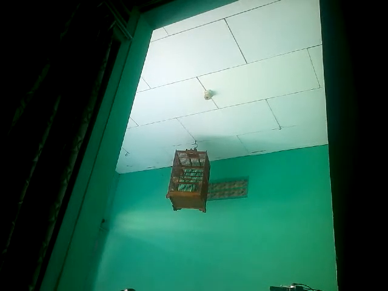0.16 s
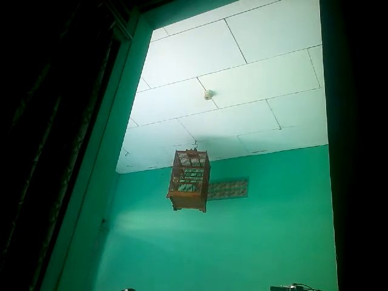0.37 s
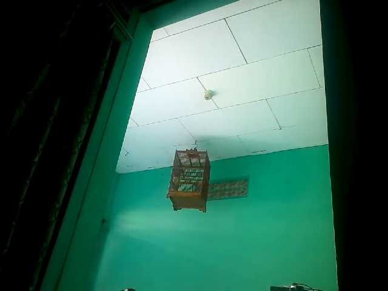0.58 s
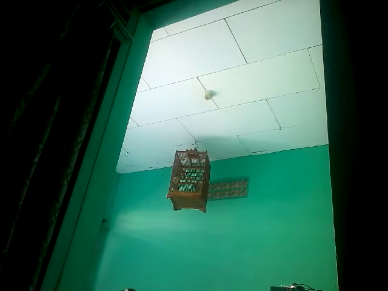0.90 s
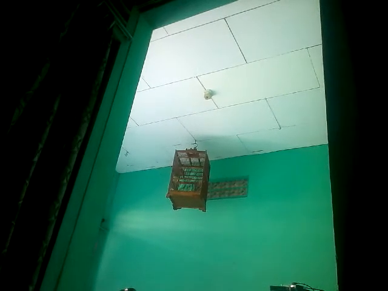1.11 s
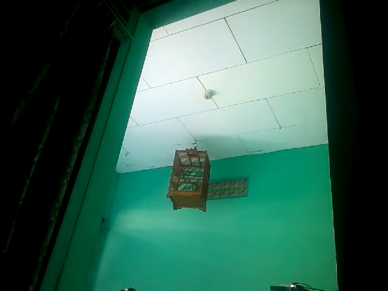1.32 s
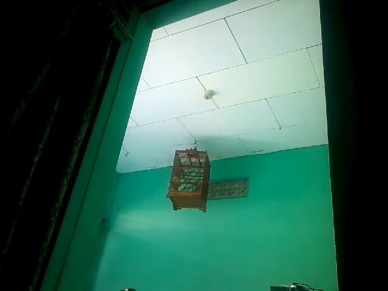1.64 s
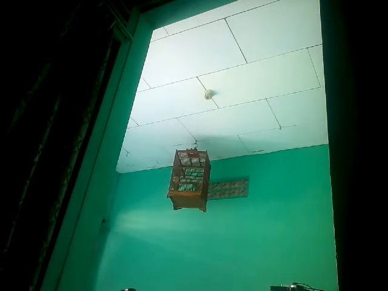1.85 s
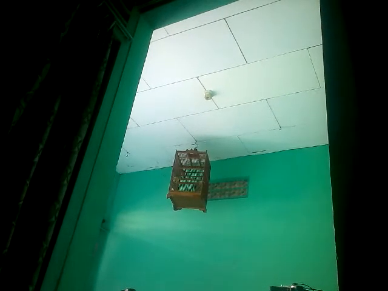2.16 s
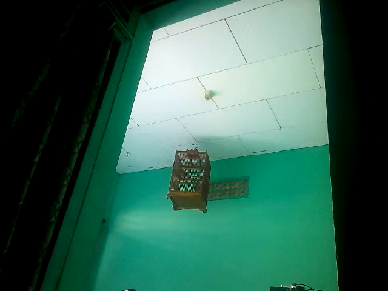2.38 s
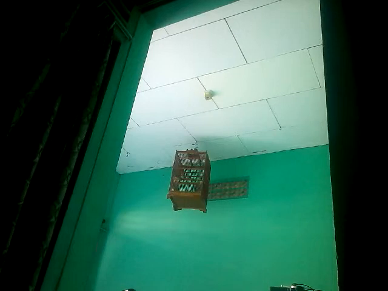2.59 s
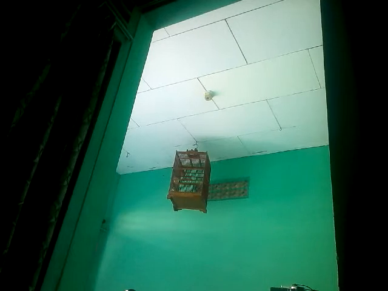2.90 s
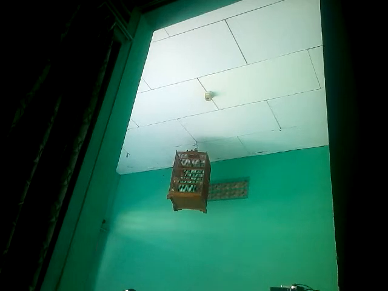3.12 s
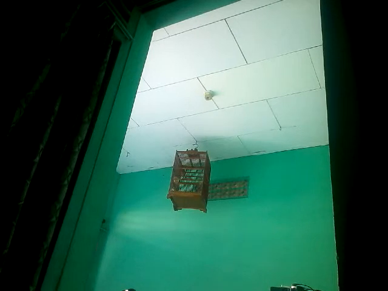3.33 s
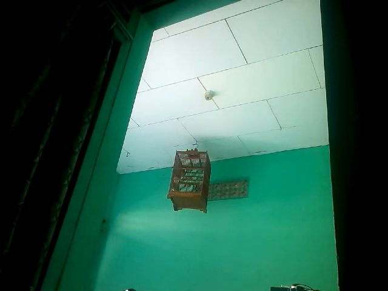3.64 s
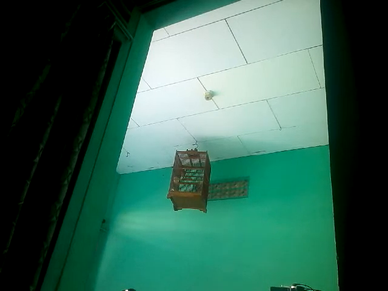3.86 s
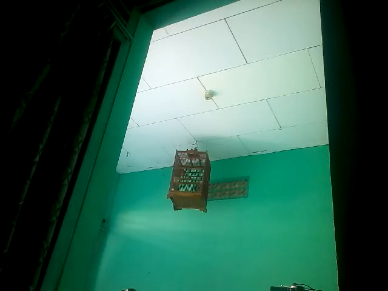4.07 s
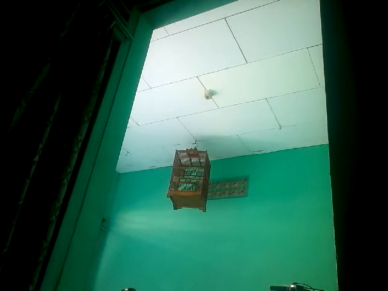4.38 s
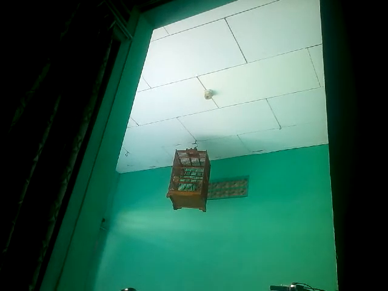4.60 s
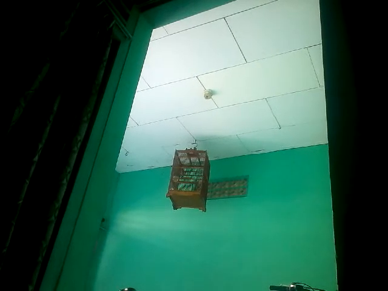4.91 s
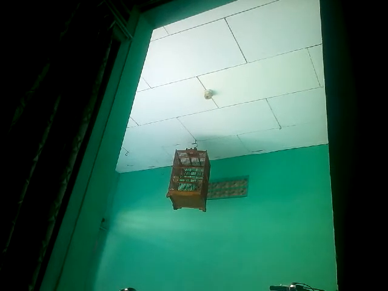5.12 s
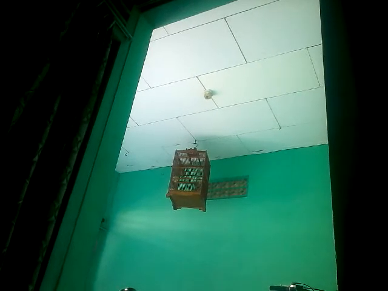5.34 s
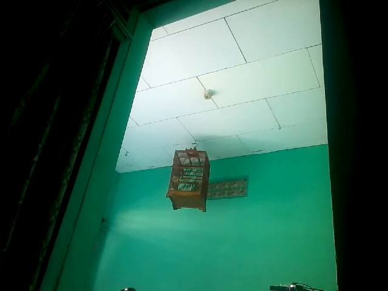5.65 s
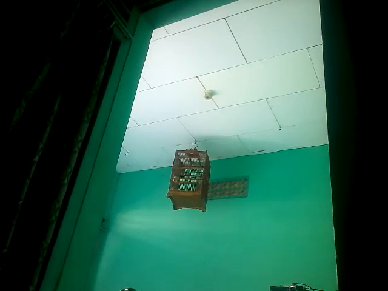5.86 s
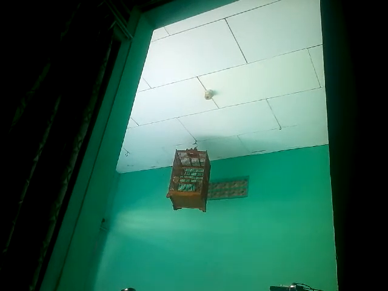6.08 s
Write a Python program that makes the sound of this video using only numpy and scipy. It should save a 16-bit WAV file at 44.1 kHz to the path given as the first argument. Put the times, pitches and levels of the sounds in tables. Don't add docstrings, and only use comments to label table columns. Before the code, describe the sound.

A canary some metres away in a bare, echoing room opens with two clicking swoops into clear high whistles, the second louder. After a pause comes one very soft rising note, another quiet gap, then a tiny chirp and a long rapid trill of falling sweeps, ending in lower, faster syllables. A phone microphone adds thin hiss, ducked pauses, a faint wavering hum and a brief soft wind puff.

```python
import sys
import numpy as np
from scipy import signal
from scipy.fft import rfft, irfft
from scipy.io import wavfile
from scipy.ndimage import uniform_filter1d, minimum_filter1d

SR = 44100
rng = np.random.default_rng(int(sys.argv[2]) if len(sys.argv) > 2 else 0)


def wrap_up_sound(samples):
    columns = np.atleast_2d(samples).T
    tamed = np.clip(columns, -1, 1)
    steps = np.round(tamed * 32767).astype(np.int16)
    wavfile.write(sys.argv[1], SR, steps)


def decibels_to_gain(level_db):
    exponent = np.asarray(level_db, float) / 20
    return 10 ** exponent


N = 276507
LEAD_S = .1


def colour(x, points):
    hz, db = np.transpose(points)
    f = np.maximum(np.fft.rfftfreq(len(x), 1 / SR), 1)
    return irfft(rfft(x) * decibels_to_gain(np.interp(np.log(f), np.log(hz), db)), len(x))


def band(lo_hz, hi_hz, order=2):
    sos = signal.butter(order, [lo_hz, hi_hz], "band", fs=SR, output="sos")
    x = signal.sosfilt(sos, rng.standard_normal(N))
    return x / x.std()


def walk(rate, size):
    k = int(SR / rate)
    steps = np.repeat(rng.standard_normal(size // k + 1), k)
    return 1.3 * uniform_filter1d(uniform_filter1d(steps, k), k)[:size]


def calls():
    # swoop_peak_s [s], swoop_db [dB], whistle_db [dB], whistle_sag_db [dB], whistle_end_hz [Hz]
    call_list = [
        (.003, -16.5, -25, 0, 4676),
        (.344, -13.5, -19, -9.5, 4539),
    ]
    # after_peak_s [s], pitch_hz [Hz], level_db [dB]
    swoop = [
        (-.028, 6830, -27.5),
        (-.02, 6550, -14.5),
        (-.009, 6250, -10),
        (-.004, 5930, -2),
        (.003, 5130, -1.5),
        (.0055, 4650, -2),
        (.0095, 4257, -3.5),
        (.012, 3200, -25.5),
    ]
    # start_s [s], pitch_hz [Hz], level_db [dB]
    rising = [
        (1.512, 3237, -68),
        (1.522, 3630, -53),
        (1.543, 3761, -53),
        (1.554, 4150, -51),
        (1.578, 4293, -44),
        (1.595, 4577, -49),
        (1.64, 4597, -40),
        (1.714, 4652, -44),
        (1.749, 4384, -59.5),
    ]
    # start_s [s], pitch_hz [Hz], level_db [dB]
    chirp = [
        (3.160, 2810, -44.5),
        (3.165, 3585, -34.5),
        (3.172, 4115, -29),
        (3.184, 3850, -31.5),
        (3.197, 2730, -47.5),
    ]
    whistle_after_s, whistle_s, whistle_hz = .029, .188, 4572
    onset_s, swell_s, release_s, onset_db = .03, .033, .03, -4.5
    under_onset_db, under_held_db, under_loss = -9, -20, 0.72
    side_hz, side_db = 430, -18.5
    for s, swoop_db, db, sag_db, end_hz in call_list:
        yield [(s + dt, hz, swoop_db + rel_db, -60) for dt, hz, rel_db in swoop]
        start = s + whistle_after_s
        end = start + whistle_s
        onset = start + onset_s
        loss_db = under_loss * (db + 22)
        held_db = under_held_db - loss_db
        whistle = [(start, whistle_hz - 40, db - 21.5, 3),
                   (onset, whistle_hz, db + onset_db, under_onset_db - loss_db),
                   (onset + swell_s, whistle_hz + 12, db, held_db),
                   (end - release_s, end_hz, db + sag_db, held_db),
                   (end, end_hz, db + sag_db - 20, under_held_db)]
        yield whistle
        yield [(t, hz + side_hz, level_db + side_db, -60) for t, hz, level_db, _ in whistle]
    yield [(s, hz, db, -14.5 - 26.5 * max(hz - 3600, 0) / 1000) for s, hz, db in rising]
    yield [(s, hz, db, -39.5) for s, hz, db in chirp]


def high_trill(count=8):
    # start_s [s], level_db [dB]
    pace = [
        (3.217, -39),
        (3.623, -25.5),
        (4.025, -24),
        (4.428, -25),
        (4.837, -24),
        (5.245, -25.5),
        (5.653, -25),
    ]
    when, db = np.transpose(pace)
    at = np.arange((len(when) - 1) * count + 1) / count
    s = np.interp(at, np.arange(len(when)), when)
    age = s - s[0]
    cold = np.exp(-age / .092)
    top_hz = 5285 - 275 * age - 324 * cold
    bottom_hz = 2825.5 + 19 * age
    length_s = .0275 + 0 * s
    level_db = np.interp(s, when, db) + 4 * (age < when[1] - s[0]) * np.sin(np.pi * at)
    lean_db = -13.5 + 6.5 * age + 4 * cold
    return np.transpose([s, top_hz, bottom_hz, length_s, level_db, lean_db])


def low_trill(count=10):
    start_s, period_s, length_s, level_db = 5.8052, .04685, .012, -26
    top_hz, bottom_hz, settle_hz, settle_s = 4004, 1390, 231, .046
    age = period_s * np.arange(count)
    return [(start_s + a, top_hz + settle_hz * np.exp(-a / settle_s), bottom_hz, length_s, level_db, 0)
            for a in age]


def add(out, rows, unsteady, octave_db):
    s, hz, db, under_db = np.transpose(rows)
    i = np.arange(int((s[0] + LEAD_S) * SR), min(int((s[-1] + LEAD_S) * SR), len(out)))
    t = i / SR - LEAD_S
    pitch = uniform_filter1d(np.interp(t, s, hz), size=60, mode="nearest") * (1 + unsteady[0, i])
    phase = 2 * np.pi * (np.cumsum(pitch) / SR + rng.random())
    octave_below = decibels_to_gain(np.interp(t, s, under_db)) * np.sin(phase / 2)
    tone = np.sin(phase) + octave_below + decibels_to_gain(octave_db) * np.sin(2 * phase)
    fade = np.clip(np.minimum(t - s[0], s[-1] - t) / .001, 0, 1)
    out[i] += np.sqrt(2) * decibels_to_gain(np.interp(t, s, db) + unsteady[1, i]) * fade * tone


def canary():
    # length_share [0-1], fall_share [0-1], level_db [dB]
    high_shape = [
        (0, 0.059, -28),
        (0.089, 0.073, -9),
        (0.25, .085, -5.5),
        (.36, .21, 2.5),
        (.46, .38, 1),
        (0.659, .75, -3.5),
        (0.858, 0.84, -4),
        (0.999, 1.046, -19.5),
    ]
    low_shape = [
        (0, 0.0088, -26),
        (0.098, 0.11, -3.5),
        (.25, .42, -1),
        (.33, .51, 1),
        (0.509, .72, 4),
        (0.618, .9, -6.5),
        (0.898, 0.98, -5),
        (1.001, 0.97, -11),
    ]
    # start_s [s], top_hz [Hz], bottom_hz [Hz], length_s [s], level_db [dB]
    slide = [
        (5.705, 4132, 2628, 0.025, -22),
        (5.753, 3668, 1575, 0.016, -25.5),
    ]
    out = np.zeros(N + int(LEAD_S * SR))
    unsteady = np.array([.005 * walk(90, size=len(out)), 4.9 * walk(70, size=len(out))])
    for rows in calls():
        add(out, rows, unsteady, octave_db=-38.5)
    trills = [(high_trill(), high_shape, -40),
              ([row + (0,) for row in slide], high_shape, -25),
              (low_trill(), low_shape, -24)]
    for trill, shape, octave_db in trills:
        when, fall, db = np.transpose(shape)
        chance = rng.standard_normal((len(trill), 4))
        for (s, top, bottom, length, level_db, lean_db), c in zip(trill, chance):
            hz = (top - fall * (top - bottom)) * (1 + 0.0033 * c[0])
            times = s + .0004 * c[1] + when * length * (1 + .03 * c[2])
            loudness_db = db + level_db + lean_db * fall + 0.59 * c[3]
            rows = np.transpose([times, hz, loudness_db, 0 * hz - 60])
            add(out, rows, 0.15 * unsteady, octave_db=octave_db)
    return decibels_to_gain(5.5) * out


def room(x):
    # delay_s [s], level_db [dB]
    echoes = [
        (.0022, -13),
        (.0036, -11.5),
        (.0095, -8),
        (.0200, -10.5),
        (0.0248, -13),
    ]
    t60_s, treble_t60_s, build_s, tail_db = .59, 1.3, .022, 4.5
    t = np.arange(int(1.2 * SR)) / SR
    density = np.clip((t / .07) ** 2, .006, 1)
    grains = rng.standard_normal(len(t)) * (rng.random(len(t)) < density) / np.sqrt(density)
    tail = grains * decibels_to_gain(-60 * t / t60_s) * (1 - np.exp(-t / build_s))
    treble = signal.sosfiltfilt(signal.butter(2, 5100, "high", fs=SR, output="sos"), tail)
    tail = tail - treble * (1 - decibels_to_gain(-60 * t / treble_t60_s))
    response = decibels_to_gain(tail_db) * tail / np.sqrt(np.sum(tail ** 2))
    response[0] += 1
    for s, db in echoes:
        response[int(s * SR)] += decibels_to_gain(db)
    return signal.fftconvolve(x, response / np.sqrt(np.sum(response ** 2)))[:len(x)]


def wind():
    # start_s [s], hold_s [s], rumble_db [dB], rustle_above_rumble_db [dB]
    gusts = [
        (3.193, 0.44, -63, -6),
        (3.699, 0.055, -48, -13.5),
        (3.80, 0.14, -41.5, -13.5),
        (3.994, 0.11, -55, -12),
        (4.264, .03, -59, -35),
    ]
    attack_s, release_db_per_s = .021, 230.5
    t = np.arange(N) / SR
    rumble, rustle = band(110, 260), decibels_to_gain(0.96) * band(470, 870, order=1)
    out = 0
    for s, hold, db, rustle_db in gusts:
        rise = np.clip((t - s) / attack_s + 1, 0, 1) ** 2
        push = rise * decibels_to_gain(db - release_db_per_s * np.maximum(t - s - hold, 0))
        out = out + push * (rumble + decibels_to_gain(rustle_db) * rustle)
    return decibels_to_gain(0.9 * walk(40, size=N)) * out


def hum():
    # peak_s [s], length_s [s], level_db [dB]
    swells = [(.17, 0.084, -63.5), (0.623, .06, -60.5), (.98, .2, -61.5), (1.407, 0.022, -59),
              (1.62, 0.055, -56), (1.845, .06, -57.5), (2.25, 0.21, -56.5), (2.95, .2, -66.5),
              (3.25, 0.044, -54.5), (3.544, 0.12, -49), (3.864, 0.12, -57.5), (4.34, 0.24, -57.5),
              (5.375, 0.037, -66.5), (5.618, 0.085, -61.5)]
    steady_db, rise_s = -72.5, .05
    t = np.arange(N) / SR
    pitch_hz = 99 + 3.5 * walk(4.6, size=N)
    level = decibels_to_gain(steady_db)
    for s, length, db in swells:
        decay = np.where(t < s, ((s - t) / rise_s) ** 2, (t - s) / (2 * length))
        level = level + decibels_to_gain(db) * np.exp(-decay)
    tone = .9 * np.sin(2 * np.pi * np.cumsum(pitch_hz) / SR)
    return decibels_to_gain(-2.5) * level * (tone + 0.81 * band(86, 114))


def room_hiss():
    # pitch_hz [Hz], level_db [dB per Hz]
    hiss_colour = [(15, 7), (40, 14), (70, 14), (140, 13), (200, 6), (350, 0), (700, -3.5), (1400, -4.5),
                   (2800, -9), (4100, -8.5), (5600, -8), (7300, -14)]
    hiss = colour(rng.standard_normal(N), hiss_colour)
    upper = signal.sosfilt(signal.butter(4, 300, "high", fs=SR, output="sos"), hiss)
    return hiss * decibels_to_gain(-66 + 1.1 * walk(3.8, size=N)) / upper.std()


def outside():
    starts = [-.06, 1.165, 1.165, 1.365, 1.515, 1.74, 2.25, 2.48, 3.33]
    # length_s [s], centre_hz [Hz], width_hz [Hz], level_db [dB]
    far_sounds = [
        (0.12, 2550, 460, -42.5),
        (0.065, 6500, 390, -65.5),
        (0.059, 5300, 2100, -71),
        (0.077, 2070, 240, -70),
        (0.064, 2650, 1200, -59),
        (0.059, 1150, 220, -68.5),
        (0.11, 900, 400, -68.5),
        (0.078, 590, 180, -73),
        (0.067, 950, 64, -65.5),
    ]
    out, t = 0, np.arange(N) / SR
    for s, (length, hz, width, db) in zip(starts, far_sounds):
        u = np.clip((t - s) / length, 0, 20)
        out = out + decibels_to_gain(db) * 4.7 * u * 2 * np.exp(-2 * u) * band(hz - width / 2, hz + width / 2)
    return out


def phone_grit(bird):
    top_db = -46 + walk(14, size=N)
    grit = decibels_to_gain(-49.5) * band(2600, 4100, order=3) + decibels_to_gain(top_db) * band(5600, 7300)
    return grit * (uniform_filter1d(bird ** 2, int(.07 * SR)) + 1e-12) ** 0.22


def scene():
    # pitch_hz [Hz], level_db [dB]
    mic = [
        (1000, -2.5),
        (2000, -2.5),
        (3000, 0.5),
        (4500, 0.78),
        (5500, 3.5),
        (6500, -4),
        (7200, -11.5),
    ]
    # from_s [s], to_s [s]
    open_spans = [
        (0, .733),
        (1.16, 1.29),
        (1.38, 1.46),
        (1.525, 1.953),
        (3.16, 6.3),
    ]
    notch_hz, notch_width_hz = 4000, 55
    bird = room(colour(canary(), mic))[-N:]
    bird = signal.lfilter(*signal.iirnotch(notch_hz, notch_hz / notch_width_hz, SR), bird)
    hiss = room_hiss()
    t = np.arange(N) / SR
    gate = sum(1. * ((t > a) & (t < b)) for a, b in open_spans)
    is_open = uniform_filter1d(gate, int(0.014 * SR), mode="nearest")
    lows = signal.sosfiltfilt(signal.butter(2, 200, fs=SR, output="sos"), hiss)
    ducked = (bird + phone_grit(bird)) * decibels_to_gain(-13 * (1 - is_open))
    lifted = (hiss - lows) * decibels_to_gain(4.7 * is_open)
    return (ducked + lifted + lows + hum() + wind() + outside())[None]


def drop_weak_bands(x):
    # from_s [s], to_s [s], change_db [dB]
    spells = [
        (.05, .62, 3),
        (1.45, 2.0, -4.5),
        (3.0, 3.31, -8.2),
        (3.34, 4.38, 5),
        (4.45, 4.78, -6),
    ]
    bar_db, ease_s, wider_db, patchy_db = -43, .041, -0.1336, 2
    f, t, z = signal.stft(x, SR, nperseg=2048, boundary="even")
    power = uniform_filter1d(np.abs(z) ** 2, size=3, axis=1)
    low_edges_hz = 700 * (1.147 ** np.r_[.85, 1.6, 2.3, 3:11] - 1)
    edges = np.searchsorted(f, np.r_[low_edges_hz, 2450:9000:345])

    def ease(s):
        return np.clip((t - s) / ease_s + .5, 0, 1)

    moment_db = bar_db + sum(db * (ease(a) - ease(b)) for a, b, db in spells)
    bar = decibels_to_gain(2 * moment_db) * power.sum(0)
    at = np.minimum((t * SR).astype(int), N - 1)
    for k, (lo, hi) in enumerate(zip(edges[:-1], edges[1:])):
        shift_db = wider_db * min(k, 11) + patchy_db * walk(7, size=N)[at]
        z[lo:hi] *= power[lo:hi].sum(0) > bar * decibels_to_gain(2 * shift_db)
    return signal.istft(z, SR, nperseg=2048)[1][:N]


def band_limit(x):
    return signal.sosfilt(signal.butter(12, 7370, fs=SR, output="sos"), x)


def record(dry):
    limit_db, top_hz = -9.5, 7150
    span = int(.004 * SR)
    gain = minimum_filter1d(np.minimum(1, decibels_to_gain(limit_db) / (np.abs(dry[0]) + 1e-9)), span)
    limited = dry[0] * uniform_filter1d(gain, span)
    cut = signal.sosfilt(signal.ellip(8, .2, 50, top_hz, fs=SR, output="sos"), limited)
    mix = drop_weak_bands(cut)[None] - .0011
    return band_limit(mix)


dry = scene()
out = record(dry)
wrap_up_sound(out)
```